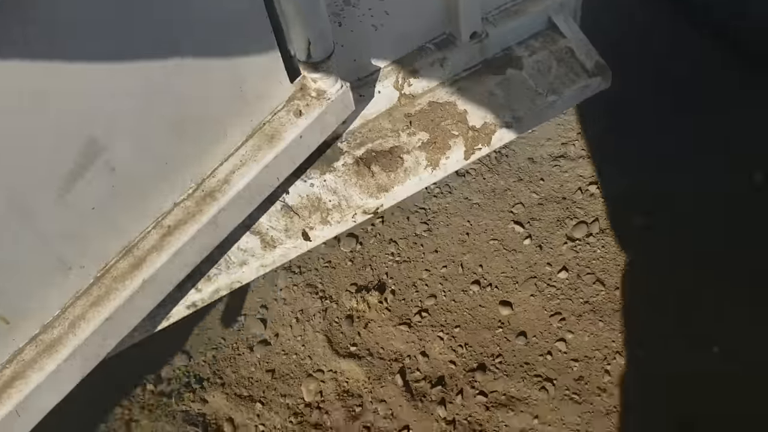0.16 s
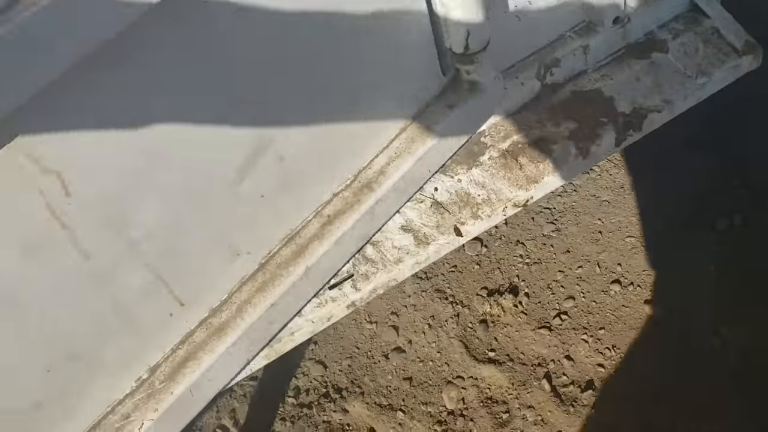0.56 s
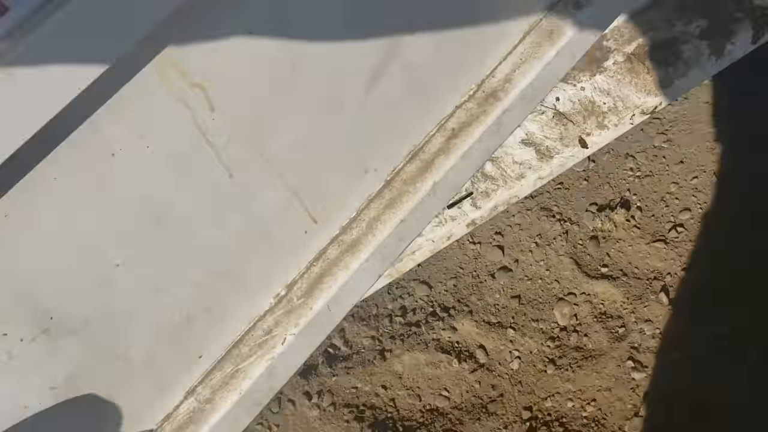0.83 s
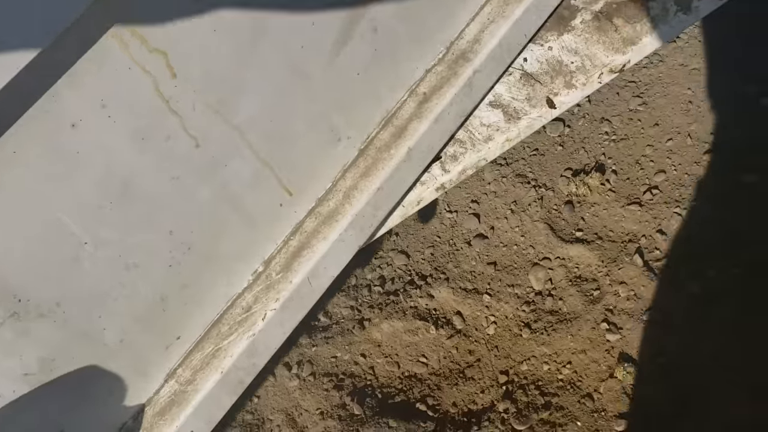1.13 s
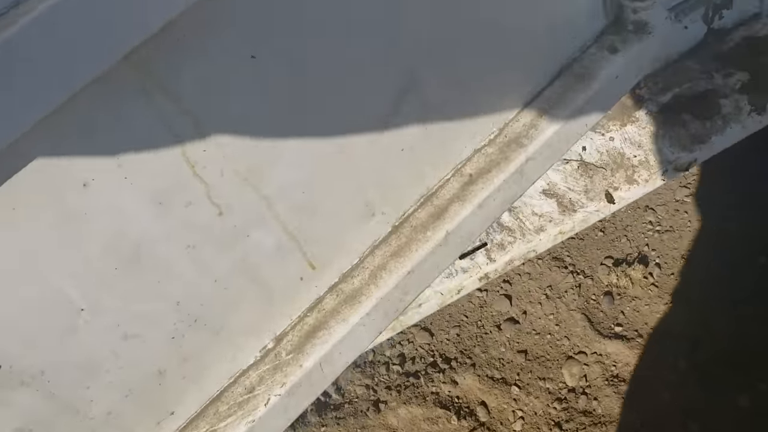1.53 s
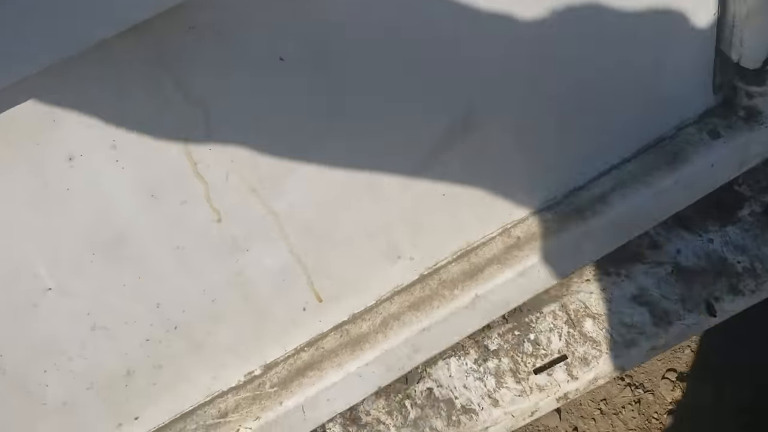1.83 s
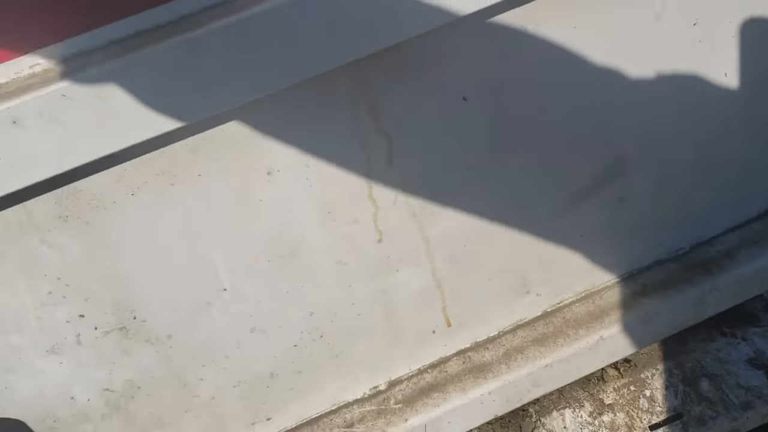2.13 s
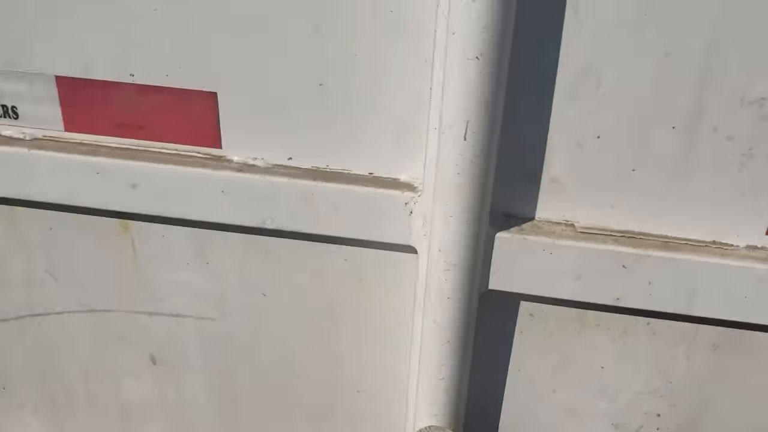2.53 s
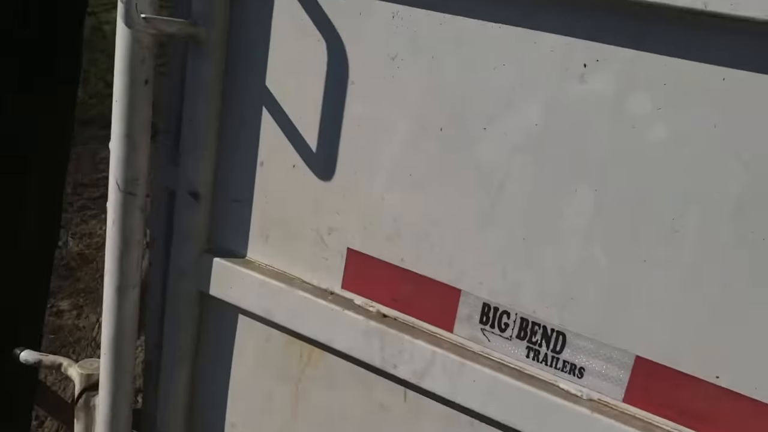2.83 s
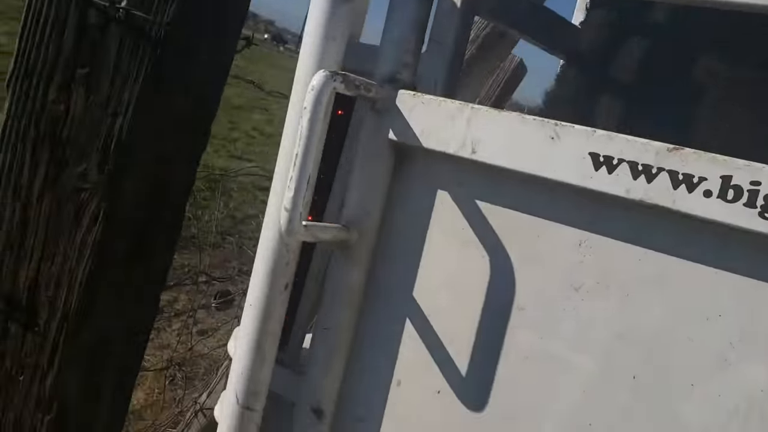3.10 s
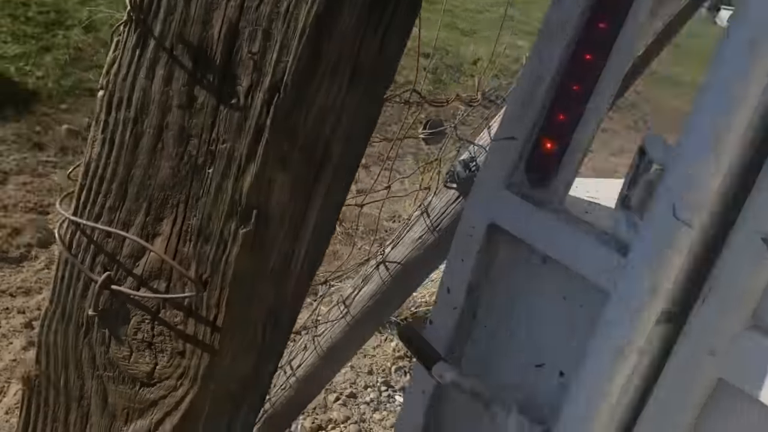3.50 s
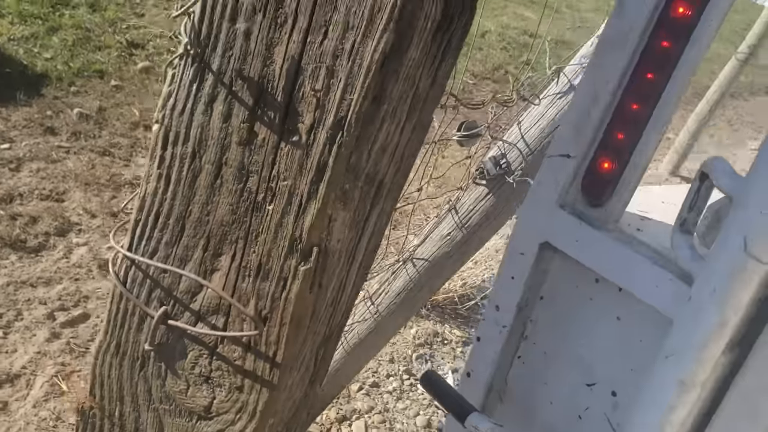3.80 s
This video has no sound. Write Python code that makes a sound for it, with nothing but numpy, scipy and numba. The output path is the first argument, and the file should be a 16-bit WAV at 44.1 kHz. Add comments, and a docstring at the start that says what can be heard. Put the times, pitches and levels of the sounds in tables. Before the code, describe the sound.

Metal livestock trailer gate clanks and rattles as it swings, then slams with a dense jangle outdoors

```python
"""A sheet-steel trailer gate is swung and shut outdoors, heard close by through two spaced microphone ports.
Knocks of frame and latch, and a few small rubs, are short chatters of contacts that set its many modes ringing;
the panel booms on. Loose parts rub and jingle as it moves and rattle densely when it slams: random touches on
the same modes. Hinges squeak as rough sliding tones, small parts tick as puffs of noise; quiet open air is
shaped noise."""
import sys
import numpy as np
from numba import njit
from scipy import signal
from scipy.fft import rfft, irfft
from scipy.io import wavfile
from scipy.ndimage import map_coordinates

SR = 44100
rng = np.random.default_rng(int(sys.argv[2]) if len(sys.argv) > 2 else 0)


def transcribe(signal):
    """Save signal, clipped to [-1, 1], as a 16-bit WAV file at the path in sys.argv[1]."""
    frames = np.atleast_2d(signal).T
    limited = np.clip(frames, -1, 1)
    pcm = np.round(limited * 32767).astype(np.int16)
    wavfile.write(sys.argv[1], SR, pcm)


N = 174195


def amp(db):
    """dB to gain."""
    return 10 ** (np.asarray(db) / 20)


def at_hz(points, hz):
    """Read a table on a log frequency axis."""
    table_hz, value = np.transpose(points)
    return np.interp(np.log(hz), np.log(table_hz), value)


def bump(hz, centre_hz, width_oct):
    """Bell over pitch in octaves, one row per centre."""
    return np.exp(-.5 * (np.log2(hz / centre_hz[:, None]) / width_oct) ** 2)


def air():
    """Open-air hush: shaped noise, more alike at both ports in the bass, its level wandering at random."""
    # Colour of the open air. Each row: frequency in Hz, relative level in dB.
    colour = [(15, -48.5), (25, -11), (72, 3.5), (169, -4.5), (210, 2.5), (283, -4.5), (2020, -20),
              (2190, -13), (3120, -21), (15700, -34)]
    # How alike the two ports hear it. Each row: frequency in Hz, left-right likeness as a ratio.
    likeness = [(60, 0.92), (500, 0.75), (2000, 0.17), (15000, 0.13)]
    level_db, swell_db = -52.5, 1.5
    hz = np.maximum(np.fft.rfftfreq(N, 1 / SR), 10)
    mid, side = rfft(rng.standard_normal((2, N))) * amp(at_hz(colour, hz))
    alike = at_hz(likeness, hz)
    mid = np.sqrt(1 + alike) * mid
    side = np.sqrt(1 - alike) * side
    hush = irfft(mid + side * [[1], [-1]], N)
    swell = np.interp(np.arange(N), np.linspace(0, N, 30), rng.standard_normal(30))
    return amp(level_db + swell_db * swell) * hush / hush.std()


def ticks():
    """Small parts tick and set nothing ringing: brief noise leaning toward a pitch, partly shared by the ports."""
    # Dry ticks. Each row: start in seconds, level in dB, pitch in Hz.
    rows = [(.555, -32, 9600), (2.825, -16.5, 1880), (2.917, -34, 4970), (2.941, -31.5, 5250),
            (2.949, -36, 5700)]
    decay_s = .0009
    out, t = np.zeros((2, N)), np.arange(400) / SR
    for s, level_db, hz in rows:
        own, shared = rng.standard_normal((2, len(t))), rng.standard_normal(len(t))
        puff = own + shared + .5 * np.sin(2 * np.pi * hz * t)
        b, a = signal.butter(1, [hz / 3, 2 * hz], "band", fs=SR)
        puff = signal.lfilter(b, a, puff)
        out[:, int(s * SR):][:, :len(t)] += amp(level_db) * puff * np.exp(-t / decay_s)
    return out


def squeaks():
    """Hinges and pins slip and squeak: short rough tones sliding in pitch, cut off fast."""
    # Each row: start in seconds, length in seconds before the fade, from Hz, to Hz, level in dB, roughness in dB.
    rows = [(.678, .04, 2220, 2210, -44, 3), (.9165, .024, 1220, 800, -10, 4),
            (2.677, .016, 1100, 700, -38, 4), (2.852, .007, 1480, 1500, -38, 1),
            (3.288, .026, 1380, 1370, -43, 2), (3.3215, .026, 2270, 2150, -35, 3),
            (3.322, .024, 1750, 1720, -38, 3)]
    attack_s, fade_s, rough_step_s = .00065, .006, .0026
    out = np.zeros(N)
    for s, length, from_hz, to_hz, level_db, rough_db in rows:
        t = np.arange(int((length + 5 * fade_s) * SR)) / SR
        hz = from_hz + (to_hz - from_hz) * np.minimum(t / length, 1) ** 2
        rough = np.interp(t, np.arange(40) * rough_step_s, rng.standard_normal(40))
        shape = np.minimum(t / attack_s, 1) * np.exp(-np.maximum(t - length, 0) / fade_s)
        tone = np.sin(2 * np.pi * np.cumsum(hz) / SR)
        out[int(s * SR):][:len(t)] += amp(level_db + rough_db * rough) * shape * tone
    return out


def modes(count=720, size=3):
    """The steel's resonances: low panel modes in clusters, then dense modes ever closer in ratio of pitch."""
    # Low panel modes. Each row: frequency in Hz, relative level in dB, time to fall 60 dB in seconds.
    panel = [(30.2, -32, 0.72), (48.1, -15, 1.36), (68.8, -22.5, 0.46), (81.4, -3, 0.52), (91.66, -2, 1.3),
             (109.6, -4, 0.97), (137.4, -2.5, 1.37), (169.7, 0, 0.79), (207.8, -1, 0.69), (228.4, -3, 0.72),
             (246.3, 1.5, 0.42), (293.2, 3, 0.48), (336.5, 4.5, 0.64), (376.3, -1.5, 0.77),
             (408.4, 3, 0.31)]
    # Dense upper modes. Each row: frequency in Hz, relative level in dB per Hz.
    dense_colour = [(240, -30), (400, 1), (685, -6.5), (786, -5.5), (990, -5), (1070, -5), (1480, -3),
                    (5610, -11.5), (7290, -14.5), (8760, -27), (12100, -21), (15700, -25)]
    # Their ringing. Each row: frequency in Hz, typical time to fall 60 dB in seconds.
    dense_t60 = [(400, 0.64), (1000, 0.19), (2500, 0.19), (6000, 0.093), (15000, 0.094)]
    # Modes damped by the hand and the contact. Each row: frequency in Hz, time to fall 60 dB in seconds.
    dull_t60 = [(500, 0.12), (1500, .04), (8000, 0.015)]
    # Edges in Hz between bass, middle, treble and top.
    edges_hz = [430, 1500, 3500]
    split, neighbour_db = 0.04957, -2.5   # mean spacing in a cluster (log ratio), level of outer members
    dull_share, t60_spread = .35, .15     # share of the dense modes, log spread

    dense = (20.8 + 107.5 * (np.arange(count) + rng.random(count)) / count) ** 2
    low, low_db, low_t60 = np.repeat(panel, size, axis=0).T
    side = np.arange(len(low)) % size - 1   # below, at or above the cluster's centre
    low_hz = low * np.exp(split * side * rng.uniform(.5, 1.5, len(low)))
    hz = np.r_[low_hz, dense]
    # dB per Hz becomes dB per mode, as mode spacing grows with the root of frequency
    dense_db = at_hz(dense_colour, dense) + 5 * np.log10(dense)
    gain = amp(np.r_[low_db + neighbour_db * abs(side), dense_db])
    dull = np.r_[0 * low, rng.random(count) < dull_share]
    bright_t60 = at_hz(dense_t60, dense) * np.exp(t60_spread * rng.standard_normal(count))
    t60 = np.where(dull, at_hz(dull_t60, hz), np.r_[low_t60, bright_t60])

    # equal energy in each range, so that contact levels set the balance
    part = np.searchsorted(edges_hz, hz)
    for k in set(part):
        gain[part == k] /= np.sqrt(np.sum(gain[part == k] ** 2) / 2)
    above_edge = 1 / (1 + (np.array(edges_hz)[::-1, None] / hz) ** 6)
    # weights run top, treble, middle, bass and sum to one for each mode
    weights = np.diff(np.vstack([0 * hz, above_edge, 1 + 0 * hz]), axis=0)
    return hz, gain, t60, dull, weights


def knocks(hz, dull, weights, mode_spread_db):
    """Frame and latch knocks and a few small rubs: a contact chatters on, losing force on average; returns
    times, dB per mode."""
    # Each row: start in seconds, top peak dB, treble dB, middle dB, bass dB (all before chatter loss),
    # strongest ring in Hz, its lift in dB, lift of the dull modes in dB.
    rows = [(0.0044, -36.5, -87, -40.5, -31.5, 694, 9.5, 15.5), (0.068, -39, -23, -18, -23, 1120, 6.5, 9.5),
            (0.0854, -10.5, -15.5, -29.5, -23, 5060, 6.5, 11.5),
            (0.1443, -17, -23.5, -15.5, -21, 2200, 7, -8), (0.1774, -14.5, -23.5, -13, -23, 1160, -5, 9),
            (0.2091, -51, -18, -19.5, -17.5, 1140, 3, 2.5), (0.2307, -14, -20, -31, -32, 907, -4, 11.5),
            (0.2901, -25, -36, -26, -22.5, 1730, 9.5, 11.5), (0.391, -34, -54, -30, -33, 4300, 19, 8),
            (0.5105, -29.5, -30.5, -30.5, -34, 1870, 8.5, -23),
            (0.608, -16.5, -20.5, -27.5, -40.5, 1930, 5.5, 4.5),
            (0.7643, -35, -46, -36, -31, 1800, 12.5, 18), (0.7723, -14, -23.5, -32, -28.5, 1370, 10.5, 6.5),
            (0.7905, -9, -17.5, -21, -25, 1780, 6, 10), (0.8215, -15, -15.5, -22, -20.5, 896, 12.5, -20),
            (0.8876, -34.5, -26, -23.5, -32.5, 1280, 10, -1),
            (0.916, -22, -19.5, -13, -37.5, 1000, 6.5, 10.5),
            (0.9984, -34.5, -33.5, -34, -42, 805, -1, 11.5), (1.042, -40, -28, -39, -41, 2010, 0, 13.5),
            (1.147, -40.5, -38.5, -28.5, -29, 840, 6.5, 7), (1.2065, -35.5, -47.5, -39.5, -39, 720, 8, -6),
            (1.4559, -45, -47, -53, -59, 1470, 7, 11.5), (1.5353, -54, -57, -57, -55, 1760, 18.5, -5),
            (1.8561, -33, -34, -32, -32.5, 871, 11, 1.5),
            (1.8682, -12.5, -25.5, -28.5, -23.5, 1330, 10, -7), (1.8875, -6.5, -13, -16.5, -21, 623, 8, 1),
            (1.9382, -3.5, -16.5, -19.5, -54, 2900, 2, 5.5), (1.9604, -7.5, -22.5, -23.5, -20, 1580, 6, 9),
            (1.9997, -32, -34, -26.5, -22.5, 950, 9.5, 9), (2.0886, -37.5, -38.5, -49.5, -28, 910, 12, 17),
            (2.1981, -39, -43.5, -41.5, -49, 930, 17, 4), (2.2495, -60, -37, -39.5, -34, 1420, 12.5, 8.5),
            (2.2727, -21, -28.5, -34.5, -41, 961, 12, 7.5), (2.3752, -19.5, -23, -25.5, -33.5, 980, 11, 2),
            (2.4851, -62, -52, -52, -48, 1530, 18.5, -9), (2.6796, -87, -58, -59, -38, 1110, 5, 24),
            (2.7462, -55, -60, -46, -47, 940, -4, -14), (3.3212, -36, -40, -43, -34, 2070, 18, 6),
            (3.3577, -19.5, -21, -27, -19, 4400, 11.5, 16), (3.3895, -50, -43, -21, -26, 900, 0, 1),
            (3.4498, -27, -32, -28, -32, 4730, 13.5, 5), (3.5019, -7.5, -11, -20, -48, 3180, 5.5, 12.5),
            (3.5275, -13, -15, -21, -29, 3320, 12, 4.5), (3.5715, -11, -14, -35, -26.5, 5500, 10.5, 11),
            (3.934, -30, -52, -41, -29, 3000, 10, 3)]
    peak_over_rms_db, ring_width_oct = 6, 0.15   # the top column is a peak level
    contacts, contact_spread_db = 4, 4
    chatter_s, chatter_loss_db = .012, 3.5   # nominal length of the chatter, loss per contact

    s, top_db, treble_db, mid_db, bass_db, ring_hz, lift_db, dull_db = np.transpose(rows)
    bands = np.stack([top_db - peak_over_rms_db, treble_db, mid_db, bass_db], axis=1)
    level = bands @ weights + np.outer(dull_db, dull)
    level += lift_db[:, None] * bump(hz, ring_hz, ring_width_oct)
    level += mode_spread_db * rng.standard_normal(level.shape)

    step = np.arange(contacts) + rng.random((len(s), contacts)) - .5
    step[:, 0] = 0
    spread = contact_spread_db * rng.standard_normal(step.shape) * (step > 0)
    contact_db = spread - chatter_loss_db * (step + 1)
    times = s[:, None] + chatter_s / contacts * step
    db = level[:, None] + contact_db[:, :, None]
    return times.ravel(), db.reshape(-1, len(hz))


def rattle(curve, hz, dull, weights, mode_spread_db, count, density):
    """Loose parts touch at random, many times a second, as strongly as the curve says; times, dB per mode."""
    per_s = 400 * density        # mean touches a second
    trim_db, dull_db = -14, 7    # light touches favour the dull modes
    touch_spread_db = 4
    patch_db, patch_oct, patch_touches = 9, .18, 5   # a run of touches on one part lifts one narrow range

    s, *bands = np.transpose(curve)
    times = s[0] + np.cumsum(rng.exponential(1, count)) / per_s
    band_db = np.stack([np.interp(times, s, b, right=-200) for b in bands], axis=1)
    # denser touches are each weaker, which keeps the mean power
    level = band_db @ weights + trim_db - 10 * np.log10(density) + dull_db * dull
    level += touch_spread_db * (np.minimum(rng.exponential(1, (count, 1)), 3) - 1)
    part = np.cumsum(rng.random(count) < 1 / patch_touches)   # moves on to another part at random
    part_hz = 600 * 2 ** rng.uniform(0, 3.5, count + 1)
    level += patch_db * bump(hz, part_hz[part], patch_oct)
    return times, level + mode_spread_db * rng.standard_normal(level.shape)


@njit(fastmath=True)
def ring(starts, kicks, fall, rise, left, right, size):
    """Every mode rises and dies after each contact: a slow decay less a fast one, summed into two channels."""
    out = np.zeros((2, size))
    for m in range(len(fall)):
        slow, fast, c = 0j, 0j, 0
        for i in range(size):
            while c < len(starts) and starts[c] <= i:
                slow += kicks[c, m]
                fast += kicks[c, m]
                c += 1
            slow *= fall[m]
            fast *= rise[m]
            out[0, i] += ((slow - fast) * left[m]).real
            out[1, i] += ((slow - fast) * right[m]).real
    return out


def turn_recorder(heard):
    """The recorder turns by the gate: arrival time at the right port and the left-right balance shift."""
    # Each row: time in seconds, lag of the right port in ms (negative leads), left minus right in dB.
    s, lag_ms, pan_db = np.transpose([(0, 0.44, 0), (2.449, 0.33, 0.3), (2.749, -0.085, 2),
                                      (3.95, -0.26, 0.6)])
    t = np.arange(N) / SR
    left, right = heard * amp(np.outer([.5, -.5], np.interp(t, s, pan_db)))
    lag = np.interp(t, s, lag_ms) * SR / 1000   # samples
    return np.stack([left, map_coordinates(right, [np.arange(N) - lag], order=3, mode="nearest")])


def gate():
    """Knocks, rubbing and the slam all strike the same modes, which reach the two ports in different phase."""
    # Loose parts rubbing and jingling. Each row: time in seconds, top, treble, middle, bass in relative dB.
    loose = [(0.0, -49, -47, -42, -23.5), (0.12, -29, -34, -27, -32), (0.25, -32.5, -32.5, -23.5, -29),
             (0.41, -37.5, -33.5, -32, -39), (0.49, -50, -58, -41.5, -48), (0.63, -31, -38, -39.5, -45),
             (0.79, -47, -54, -48, -25), (0.91, -25, -23.5, -13, -42), (1.0, -48, -44, -42.5, -34.5),
             (1.22, -50.5, -62, -36.5, -35.5), (1.6, -102, -77.5, -56.5, -87),
             (1.9, -44.5, -47, -91.5, -48), (2.05, -40.5, -40.5, -38.5, -54), (2.29, -47, -54, -41, -34.5),
             (2.49, -46, -45.5, -44.5, -67), (2.57, -44.5, -37.5, -40, -51), (2.66, -63, -48.5, -44.5, -44),
             (2.8, -43, -40, -43, -52), (2.87, -45.5, -47, -50.5, -68), (3.03, -49.5, -44.5, -50.5, -50),
             (3.23, -42, -42.5, -44, -58), (3.39, -40.5, -27.5, -34, -42), (3.5, -35, -51, -46, -33)]
    # The slam shakes everything loose. Each row: time in seconds, top, treble, middle, bass in relative dB.
    slam = [(3.5, -28, -21, -31, -40), (3.504, -10.5, -22, -19, -23), (3.544, -7.5, -21, -17, -26),
            (3.578, -6.5, -12.5, -19.5, -23.5), (3.635, -6.5, -14, -17.5, -24.5),
            (3.676, -9.5, -17, -17, -24), (3.72, -20, -28, -26.5, -32), (3.78, -32.5, -31, -37.5, -37),
            (3.9, -48.5, -45, -43, -35.5)]
    # Lift of the top treble. Each row: time in seconds, lift in dB.
    sheen = [(.3, 0), (.7, -1), (1.2, 1), (1.9, -3.5), (2.4, -2), (2.75, 12.5), (3.5, -5), (3.63, 2),
             (3.8, -2.5)]
    # How a mode builds up. Each row: frequency in Hz, rise time constant in seconds.
    build_up = [(70, 0.013), (400, 0.002), (1500, 0.0012), (15000, 0.00035)]
    # Own share of each port. Each row: frequency in Hz, share as a ratio.
    width = [(100, 0.021), (500, 0.17), (1500, 0.92), (5000, 0.95), (15000, 1)]
    sheen_hz, mode_spread_db = 8000, 3

    hz, gain, t60, dull, weights = modes()
    steel = hz, dull, weights, mode_spread_db
    strikes = [knocks(*steel),
               rattle(loose, *steel, count=1500, density=1),
               rattle(slam, *steel, count=700, density=4)]
    times, db = [np.concatenate(p) for p in zip(*strikes)]
    db = db + np.outer(np.interp(times, *np.transpose(sheen)), 1 / (1 + (sheen_hz / hz) ** 6))
    kicks = amp(db) * gain * np.exp(2j * np.pi * rng.random(db.shape))

    own = at_hz(width, hz) * np.exp(2j * np.pi * rng.random(len(hz)))
    power = np.sqrt(1 + abs(own) ** 2)
    left, right = (1 + own) / power, (1 - own) / power

    spin = 2j * np.pi * hz / SR   # phase advance per sample
    fall = np.exp(spin - np.log(1000) / (t60 * SR))
    rise = np.exp(spin - 1 / (at_hz(build_up, hz) * SR))
    order = np.argsort(times)
    starts = (times[order] * SR).astype(np.int64)
    return turn_recorder(ring(starts, kicks[order], fall, rise, left, right, N))


def scene():
    """Gate, squeaks and ticks over open air."""
    return air() + ticks() + squeaks() + gate()


def record(dry):
    """Peaks are rounded, the top is cut."""
    ceiling, cutoff_hz = 1.15, 16450
    rounded = ceiling * np.tanh(dry / ceiling)
    low_pass = signal.cheby2(22, 70, cutoff_hz, fs=SR, output="sos")
    return signal.sosfilt(low_pass, rounded)


dry = scene()
out = record(dry)
transcribe(out)
```